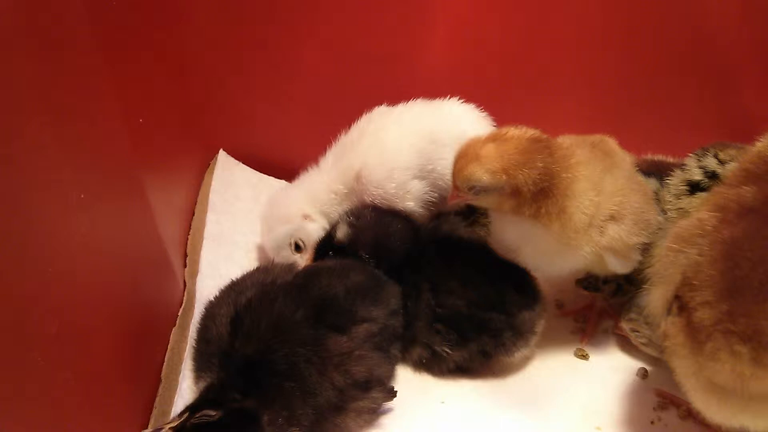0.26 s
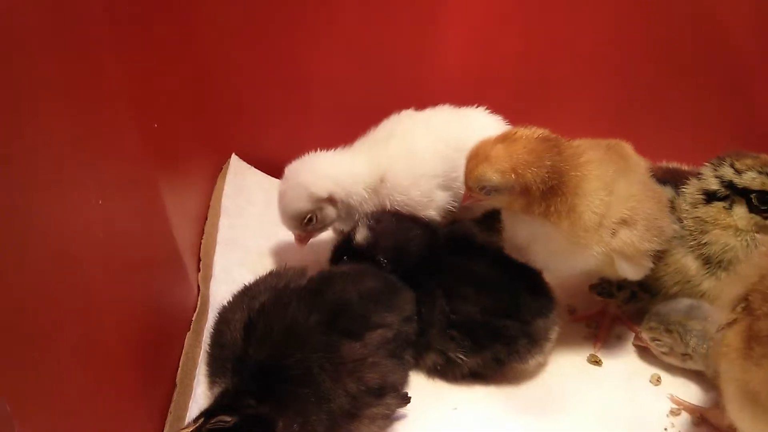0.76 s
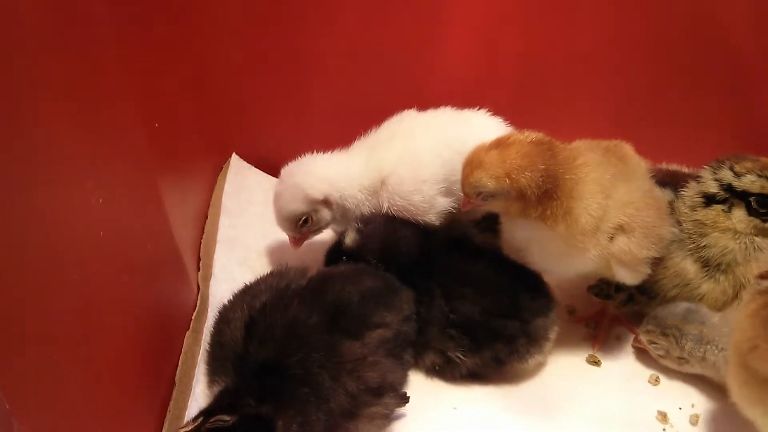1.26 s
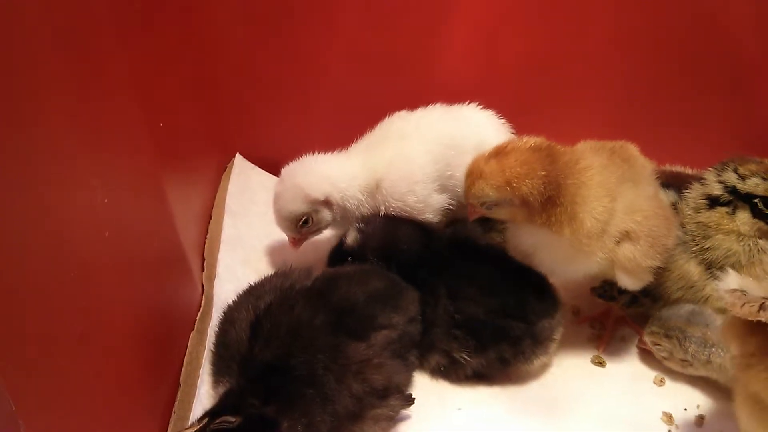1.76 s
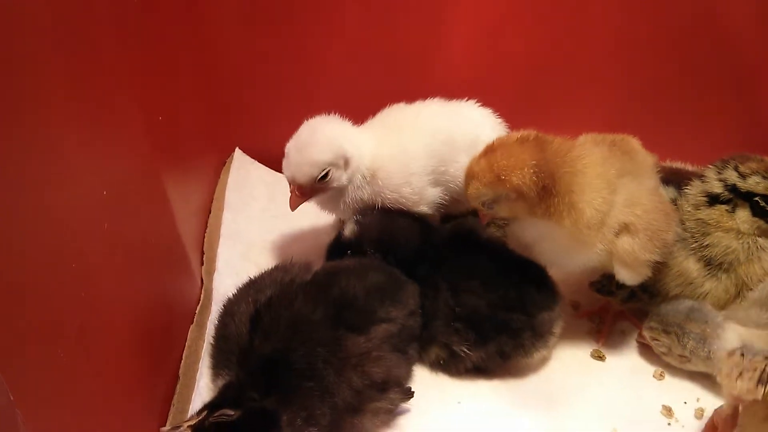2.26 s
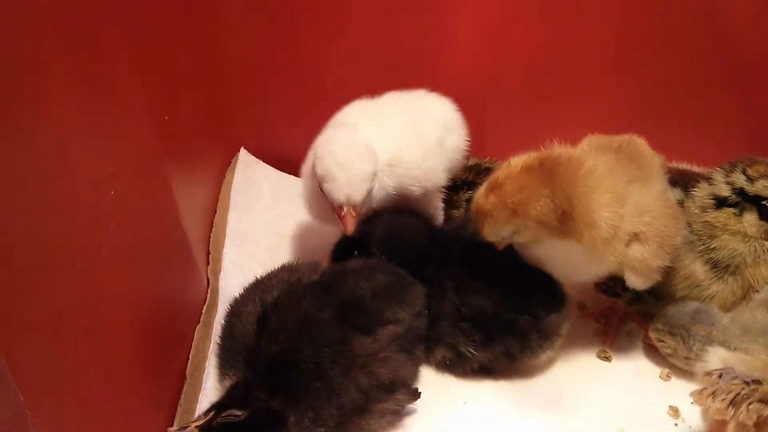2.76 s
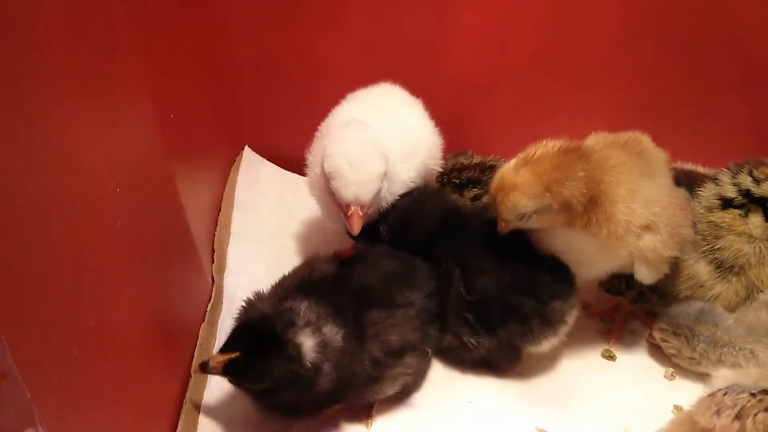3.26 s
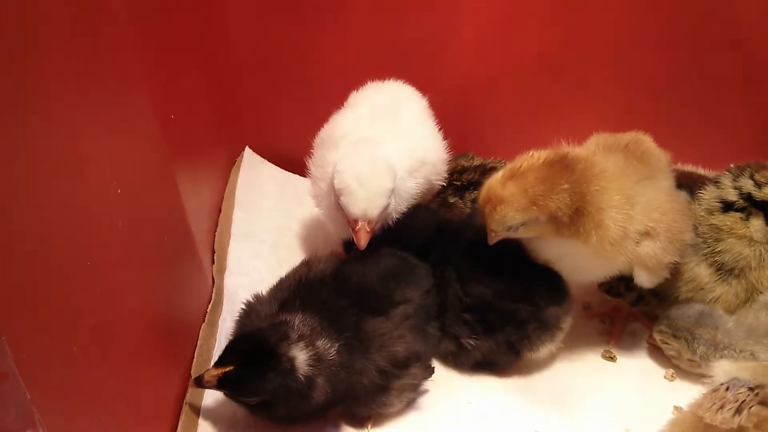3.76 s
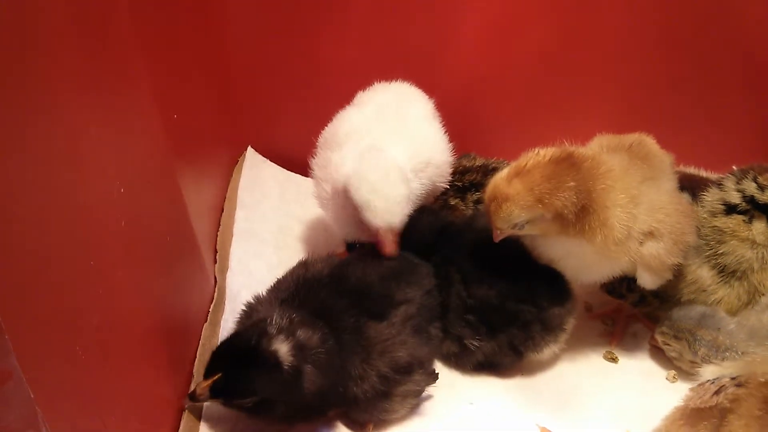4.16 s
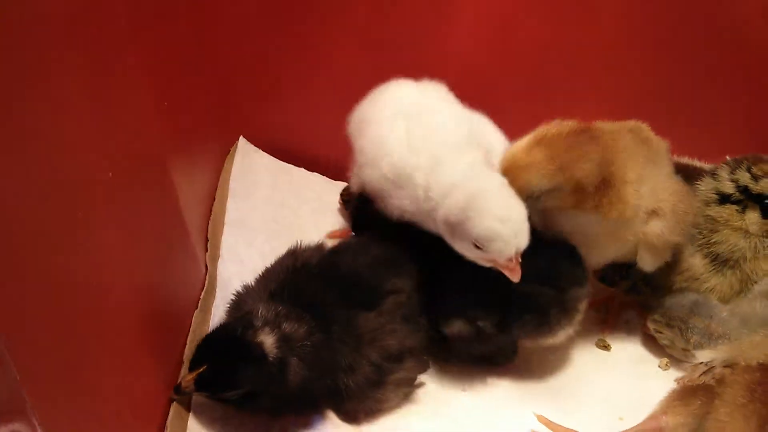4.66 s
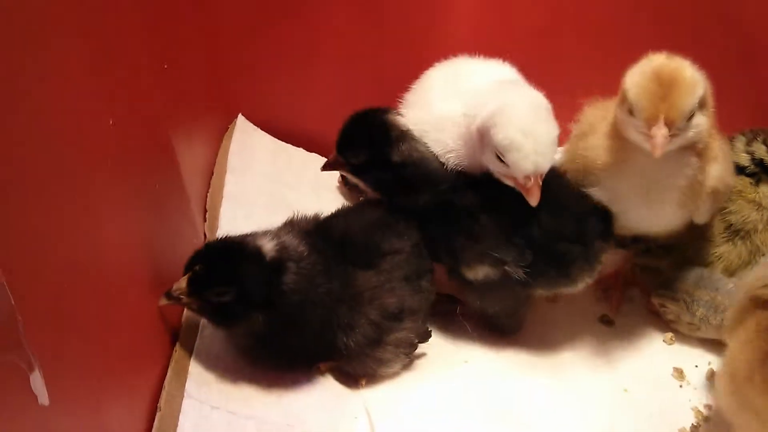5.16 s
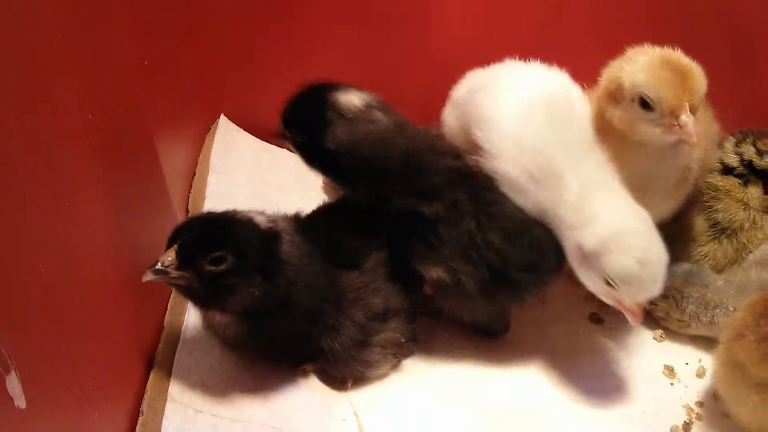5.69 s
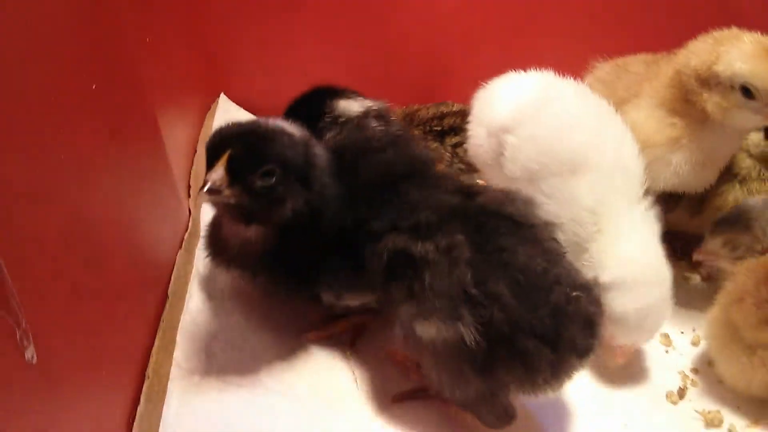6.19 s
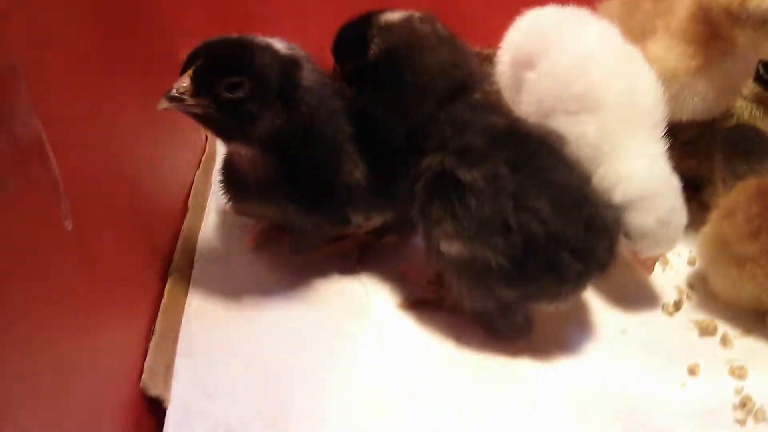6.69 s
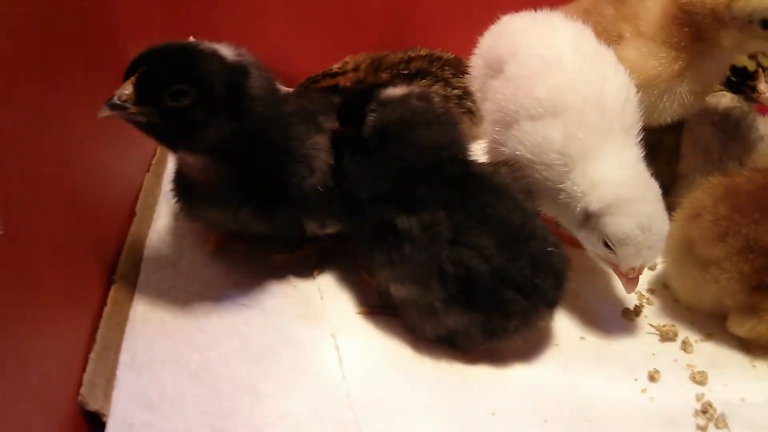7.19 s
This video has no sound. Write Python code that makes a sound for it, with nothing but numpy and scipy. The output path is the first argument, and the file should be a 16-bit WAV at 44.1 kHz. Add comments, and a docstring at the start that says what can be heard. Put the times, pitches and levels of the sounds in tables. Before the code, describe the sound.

Indoors, close to a plastic brooder tub, chicks peep in very short, upward-whipping whistles. A couple of peeps and low thumps come first, then a quiet gap with faint scuffs. Scattered peeps return, one loud, then a brief trill and a busy run of calls with knocks, hollow taps and claws scraping paper. Two hard beak snaps hit right at the microphone. Soft room hiss and low hum lie beneath.

```python
"""Over room hiss and a wavering low hum, restless feet patter; chicks peep in a plastic tub.
The first peeps are frequency-modulated whistles with weak overtones, combed by delayed bounces in the tub.
Paper scuffs follow as swelling noise bursts, then knocks as short pushes convolved with panel resonances,
then light taps as damped single modes; treble hiss swells after each call, knock and scuff. Later come
wavering trills and, close to the microphone, two beak strikes: pressure pulses with a damped cavity ring."""
import sys
import numpy as np
from scipy import signal
from scipy.fft import rfft, irfft
from scipy.io import wavfile
from scipy.ndimage import uniform_filter1d

SR = 44100
rng = np.random.default_rng(int(sys.argv[2]) if len(sys.argv) > 2 else 0)


def to_wav(sig):
    """Store sig (one row per channel, or 1-D mono) as 16-bit WAV at the path in sys.argv[1].

    Samples outside -1..1 are clipped; the rate is SR.
    """
    pcm = np.clip(np.atleast_2d(sig), -1, 1) * 32767
    pcm = np.round(pcm).astype(np.int16)
    wavfile.write(sys.argv[1], SR, pcm.T)  # frames by channels


N = 328104


def undb(db):
    """Level definition: amplitude ratio from decibels."""
    return 10 ** (np.asarray(db) / 20)


def unit(x):
    """Normalisation: scales a signal to rms 1."""
    return x / np.sqrt(np.mean(x ** 2))


def curve(s, values):
    """Linear interpolation between points, at every sample."""
    return np.interp(np.arange(N) / SR, s, values)


def coloured(x, shape):
    """Spectral shaping: weights the spectrum by (f/Hz, level/dB) points and scales to rms 1."""
    points_hz, points_db = np.transpose(shape)
    f = np.arange(N // 2 + 1) * SR / N + 1
    gain = undb(np.interp(np.log(f), np.log(points_hz), points_db))
    return unit(irfft(rfft(x) * gain, N))


def band(x, hz, width_hz):
    """Resonance: a two-pole band-pass, scaled to rms 1."""
    b, a = signal.iirpeak(hz, hz / width_hz, SR)
    return unit(signal.lfilter(b, a, x))


def walk(rate):
    """Random modulation, slow or fast by its rate: levels drawn every 1 / rate s, smoothed, rms 1."""
    hold = int(SR / rate)
    steps = np.repeat(rng.standard_normal(N // hold + 1), hold)
    return unit(uniform_filter1d(steps, hold)[:N])


def add(track, s, sound):
    """Superposition: mixes a sound in at s seconds."""
    i = int(s * SR)
    track[i:i + len(sound)] += sound[:N - i]


# Spectrum of the room hiss: f/Hz, relative density level/dB
ROOM_SPECTRUM = [(15, -44), (25, -12), (48, -2.5), (116, -5.5), (241, -9.5), (981, -18), (1730, -20.5),
                 (2700, -32), (3700, -36.5), (5370, -32), (8490, -22.5), (15800, -29)]
# Course of the hum: t/s, level/dB
HUM_LEVELS = [(1.3, -66), (1.8, -65), (3.4, -62), (3.8, -64)]
ROOM_DB = -67.5
HISS_SWELL_DB, HISS_SWELL_PER_S = 1.6, 11
HUM_HZ, HUM_WIDTH_HZ = 94, 6


def room():
    """Filtered noise: hiss under random amplitude modulation, and a narrow band heard as a wavering hum."""
    hum = band(rng.standard_normal(N), HUM_HZ, HUM_WIDTH_HZ) * undb(curve(*np.transpose(HUM_LEVELS)))
    hiss_level = undb(ROOM_DB + HISS_SWELL_DB * walk(HISS_SWELL_PER_S))
    return hiss_level * coloured(rng.standard_normal(N), ROOM_SPECTRUM) + hum


# Treble hiss level/dB after a sound at REFERENCE_DB; share of each further dB
HISS_PEEP_DB, HISS_KNOCK_DB, HISS_SCUFF_DB, HISS_SHARE = -67.5, -74.5, -61, 0.4
REFERENCE_DB = -40


def hiss_swells():
    """Level scaling: (t/s, level/dB) of the treble hiss after each call, knock and scuff."""
    kinds = [(PEEP_CALLS + TRILL_CALLS, 6, HISS_PEEP_DB),
             (KNOCK_BLOWS, 1, HISS_KNOCK_DB),
             (SCUFF_STROKES, 2, HISS_SCUFF_DB)]  # rows, their level column, hiss level
    return [(row[0], db + HISS_SHARE * (row[column] - REFERENCE_DB))
            for rows, column, db in kinds for row in rows]


# Resonances of the tub panels: f/Hz, relative level/dB, reverberation time t60/s
TUB_PANELS = [(58.15, 3, 0.48), (87.9, -7.5, 0.12), (133, 9, 0.061), (203.3, 7.5, 0.13), (293, 7.5, 0.048),
              (491, 6, 0.065), (749, 3.5, 0.056), (847, -1, 0.046), (1410, -6, 0.047)]
# Course of the patter of restless feet: t/s, level/dB before the low-pass
PATTER_LEVELS = [(0.0, -67.5), (0.89, -73.5), (2.98, -66.5), (4.48, -67), (5.1, -60.5), (5.78, -60),
                 (5.97, -52.5), (6.42, -61.5), (7.44, -71.5)]
SETTLE_S = 0.089  # time constant with which the power of the treble hiss dies away


def stir():
    """Random steps excite panel modes; treble hiss swells after each call, knock and scuff and dies away."""
    steps = rng.standard_normal(N) * undb(4.5 * walk(80))
    patter = sum(undb(db) * band(band(steps, hz, hz / 2), hz, 5.2 / t60) for hz, db, t60 in TUB_PANELS)
    power, t = np.zeros(N), np.arange(SR) / SR
    for s, db in hiss_swells():
        add(power, s, undb(2 * db) * np.minimum(t / .02, 1) * np.exp(-t / SETTLE_S))
    hiss = band(band(rng.standard_normal(N), 7000, 6000), 20000, 8400)
    hiss = hiss * undb(1.5 * walk(30) + 1.5 * walk(300))
    # the swells add as powers, so the root gives the amplitude
    return undb(curve(*np.transpose(PATTER_LEVELS))) * unit(patter) + np.sqrt(power) * hiss


SCOOP_HZ, SCOOP_S = 150, 0.0028
CREEP_SHARE, HELD_SHARE = .22, -.05  # part of the climb made at a steady rate
HELD_LATE = 4  # lateness from which a note is held before its flick
SAG_HZ, SAG_S, SAG_POWER = 875, .014, 2.5


def glide(start_hz, top_hz, rise, fall, late):
    """Frequency modulation: scoops in, creeps up, sweeps to the top and sags as the breath runs out."""
    t = np.arange(int((rise + fall) * SR)) / SR
    x = np.minimum(t / rise, 1)
    # held notes droop until the flick
    creep = CREEP_SHARE * min(late, 1) ** 2 if late < HELD_LATE else HELD_SHARE
    climb = creep * x + (1 - creep) * np.sin(np.pi / 2 * x ** late) ** 2
    scoop = SCOOP_HZ * np.exp(-t / SCOOP_S)
    sag = SAG_HZ * (np.maximum(t - rise, 0) / SAG_S) ** SAG_POWER
    return start_hz + (top_hz - start_hz) * climb - scoop - sag


ATTACK_S, RELEASE_S = 0.0071, 0.0029
SWELL_DB_PER_S, FADE_POWER = 394.5, 0.42
TRILL_DB_PER_KHZ = 16  # trills are louder where they are higher
EFFORT_SHARE = 0.31  # overtone dB for each dB of the swell and fade
DEEP_HZ = 2990  # voices whose pitch begins below this crack
BREAK_HZ, BREAK_WIDTH_HZ = 3800, 350
CRACK_RAD, CRACK_DEPTH = .42, .14
THIN_DB, SHIMMER_DB = 9, 3.3
# Gliding calls before the tub's bounces: t/s, start f/Hz, top f/Hz, rise t/s, fall t/s, lateness of the
# rise [exponent], nominal peak level/dB, loudest after t/s, fade by the end level/dB,
# octave level/dB, third harmonic level/dB (both relative to the fundamental)
PEEP_CALLS = [(0.167, 2514, 4800, 0.051, 0.004, 1.7, -35, 0.031, 13, -17.5, -42),
              (0.471, 2905, 5250, 0.056, 0.016, 2.2, -41, 0.02, 2, -16.5, -38),
              (2.671, 3650, 4680, 0.046, 0.013, 4.1, -49.5, 0.046, 5, -11, -26),
              (2.723, 4450, 4890, 0.032, 0.018, 1.3, -46, 0.033, 16, -22, -38),
              (3.2, 3158, 4175, 0.031, 0.016, 1.6, -42, 0.036, 15, -40, -45),
              (3.364, 3640, 4390, 0.027, 0.018, 1.16, -42, 0.027, 12, -20, -40),
              (3.387, 2796, 4450, 0.046, 0.006, 2.05, -39, 0.024, 7, -22, -42),
              (3.926, 3350, 4350, 0.038, 0.014, 1.34, -43, 0.032, 7, -23, -49),
              (4.01, 3060, 4250, 0.038, .003, 1, -50, 0.018, 3, -22, -44),
              (4.047, 2846, 4100, 0.048, 0.0041, 7.6, -52, 0.023, 6.5, -6, -30),
              (4.351, 2928, 3880, 0.062, 0.005, 10, -57.5, 0.023, 0.5, -7, -9),
              (4.439, 2950, 4830, 0.053, 0.013, 2.1, -25, 0.023, 20, -17, -29),
              (4.673, 3690, 4400, 0.03, 0.01, 2.4, -36, 0.048, -6, -16, -38),
              (5.209, 3250, 4780, 0.033, 0.014, 1.23, -48, 0.028, 7, -10, -30),
              (5.237, 3870, 4405, 0.041, 0.0048, 1.07, -33.5, 0.031, 14, -17, -40),
              (5.297, 2860, 5170, 0.056, 0.0044, 1.95, -26.5, 0.02, 16.5, -13, -28),
              (5.437, 3660, 4820, 0.018, 0.017, 0.8, -44, 0.022, 17, -13, -35),
              (5.513, 3450, 4415, 0.035, 0.017, 1.57, -36, 0.036, 5, -12.5, -30),
              (5.541, 3018, 5280, 0.047, 0.013, 3.1, -30.5, 0.024, 15.5, -17, -31),
              (5.715, 3700, 4248, 0.05, 0.012, 0.29, -33.5, 0.031, 20.5, -8.5, -50),
              (5.851, 3880, 4510, 0.036, 0.012, 0.208, -31, 0.04, 10, -18.5, -24),
              (5.952, 2897, 5240, 0.062, 0.003, 2.4, -38, 0.021, 1, -9.5, -18),
              (5.977, 2914, 4370, 0.05, 0.0047, 2.0, -32, 0.024, 16.5, -24, -40),
              (6.056, 3490, 4467, 0.04, 0.017, 0.75, -34.5, 0.035, 15, -12.5, -18),
              (6.236, 3385, 4346, 0.034, 0.017, 1.33, -34, 0.019, 10, -17.5, -24.5),
              (6.617, 3000, 5180, 0.056, 0.0071, 2.6, -32.5, 0.021, 8, -3.5, -15.5),
              (6.761, 3370, 4360, 0.038, 0.015, 2.5, -38, 0.033, 7.5, -21, -34),
              (7.191, 2750, 2790, 0.034, 0.0016, 1.9, -50.5, .008, 11, -22, -40),
              (7.226, 2856, 4660, 0.052, 0.016, 2.47, -30, 0.024, 16, -24, -33),
              (7.294, 3074, 4800, 0.051, 0.0057, 2.5, -28.5, 0.02, 12, -13, -29)]


def peeps():
    """Harmonic synthesis of syrinx whistles, glides and trills; period doubling cracks the deep voices."""
    out = np.zeros(N)
    flutter, wobble, shimmer = walk(1500), walk(150), walk(200)
    calls = [(row[0], glide(*row[1:6]), 0, *row[6:]) for row in PEEP_CALLS]
    calls += [(row[0], trill(*row[1:6], row[-1]), TRILL_DB_PER_KHZ, *row[6:-1]) for row in TRILL_CALLS]
    for s, pitch, lift_db, db, loudest, fade_db, octave_db, third_db in calls:
        u, length = np.linspace(0, 1, len(pitch)), len(pitch) / SR
        during = slice(int(s * SR), int(s * SR) + len(u))
        hz = pitch * (1 + 0.0077 * wobble[during])

        lift = lift_db * (pitch - pitch.mean()) / 1e3
        swell = SWELL_DB_PER_S * np.maximum(loudest - u * length, 0)
        fade = fade_db * np.interp(u * length, [loudest, length], [0, 1]) ** FADE_POWER
        level_db = db + lift - swell - fade

        deep = pitch[0] < DEEP_HZ
        above_break = (hz - BREAK_HZ) / BREAK_WIDTH_HZ
        thin = deep * np.clip(above_break + 0.27, 0, 1)  # weaker and rougher above the crack
        cracked = deep * np.exp(-above_break ** 2)
        edges = np.minimum(1, length * np.minimum(u / ATTACK_S, (1 - u) / RELEASE_S))
        size = undb(level_db - THIN_DB * thin + SHIMMER_DB * shimmer[during]) * edges

        roughness_rad = 0.007 + CRACK_RAD * np.maximum(cracked, thin / 2)
        phase = 2 * np.pi * np.cumsum(hz) / SR + roughness_rad * flutter[during]
        effort_db = EFFORT_SHARE * (level_db - db) - THIN_DB * thin  # overtones grow with effort
        overtones = undb(octave_db) * np.sin(2 * phase) + undb(third_db) * np.sin(3 * phase)
        # strong and weak cycles alternate in the crack: lines at half and one and a half times the pitch
        fundamental = np.sin(phase) * (1 + CRACK_DEPTH * cracked * np.sin(phase / 2))
        add(out, s, size * (fundamental + undb(effort_db) * overtones))
    return out


# Bounces off floor and wall of the tub: delay t/s, level/dB relative to the direct sound
TUB_BOUNCES = [(.00302, -3), (.00603, -10)]
TAIL_DB, TAIL_T60_S = -8.5, 0.11  # tub; relative level
LATE_DB, LATE_T60_S = -37, .35  # room; relative level
TAIL_HZ, TAIL_WIDTH_HZ = 4300, 2600


def in_tub(x):
    """Comb filtering by close bounces, then reverberation: a short bright tub tail and a faint room tail."""
    t = np.arange(SR // 2) / SR
    tails = undb(TAIL_DB) * 1000. ** (-t / TAIL_T60_S) + undb(LATE_DB) * 1000. ** (-t / LATE_T60_S)
    scatter = band(rng.standard_normal(len(t)), TAIL_HZ, TAIL_WIDTH_HZ)
    echo = scatter * tails * np.clip(t / 0.004, 0, 1) / np.sqrt(SR / 20)
    echo[0] = 1  # direct sound
    for s, db in TUB_BOUNCES:
        echo[int(s * SR)] += undb(db)
    return signal.fftconvolve(x, echo)[:N]


# Spectrum of rustling paper, also used for the cracks of the knocks: f/Hz, relative density level/dB
RUSTLE_SPECTRUM = [(880, -9), (1500, -9), (2960, -20.5), (4260, -11), (4840, -5.5), (6450, -8), (8750, -2),
                   (15800, -17.5)]
# Strokes of the claws: crest t/s, time scale t/s, nominal rustle level/dB, nominal scrape level/dB
SCUFF_STROKES = [(0.264, 0.025, -61.5, -74), (0.447, 0.0067, -54.5, -84), (2.062, 0.039, -62, -71),
                 (2.099, 0.0034, -53.5, -60), (2.793, 0.031, -60.5, -73), (2.925, 0.012, -41, -41.5),
                 (2.999, 0.19, -67, -65), (3.058, 0.03, -61.5, -61), (3.407, 0.0066, -56, -62),
                 (3.426, 0.0054, -55, -63), (3.723, 0.035, -70, -61), (4.468, 0.012, -55.5, -72.5),
                 (4.716, 0.0016, -57.5, -76), (4.966, 0.03, -56.5, -59), (5.679, 0.0078, -59, -74.5),
                 (5.896, 0.0098, -49, -40), (5.98, 0.15, -63, -61), (6.287, 0.0033, -51, -43),
                 (6.525, 0.025, -61.5, -70.5), (7.067, 0.023, -64, -79)]


def scuffs():
    """Friction noise of claws over paper: gritty bursts of bright rustle and duller scrape."""
    t = np.arange(N) / SR
    grit = undb(3 * walk(500))
    rustle = grit * coloured(rng.standard_normal(N), RUSTLE_SPECTRUM)
    scrape = band(band(grit * rng.standard_normal(N), 790, 860), 1000, 1200)
    out = np.zeros(N)
    for s, spread, rustle_db, scrape_db in SCUFF_STROKES:
        near = slice(int((s - 4 * spread) * SR), int((s + 4 * spread) * SR))
        steepness = np.where(t[near] < s, 4, 1.5)  # bites fast, trails off
        swell = 1 / np.cosh((t[near] - s) / spread * steepness)
        out[near] += swell * (undb(rustle_db) * rustle[near] + undb(scrape_db) * scrape[near])
    return out


# Blows on the tub: t/s, nominal push level/dB, push f/Hz, nominal crack level/dB
KNOCK_BLOWS = [(0.307, -22, 157, -53.5), (0.56, -20.5, 176, -44.5), (1.186, -27.5, 158, -55),
               (1.814, -36.5, 113, -97), (2.879, -38, 493, -70.5), (2.886, -30.5, 500, -58),
               (3.097, -32, 156.6, -58), (3.581, -42.5, 230, -95), (3.653, -33.5, 197, -53.5),
               (3.716, -37, 207, -87), (4.082, -35, 167, -60), (4.847, -46, 254, -59),
               (4.957, -34, 294, -55), (5.023, -27, 160.5, -51.5), (5.032, -33, 119, -71),
               (5.516, -35.5, 174, -56.5), (5.801, -38, 186, -58), (5.893, -21.5, 219, -40),
               (5.933, -21, 183, -49), (6.068, -17.5, 186, -45), (6.286, -29.5, 130, -61),
               (6.62, -35.5, 510, -84), (6.636, -28, 504, -74), (6.723, -20.5, 530, -46),
               (7.062, -34.5, 130.3, -82.5)]


def knocks():
    """Impact response: a push, longer for low thumps, heard directly, through panel modes and a rattle."""
    push, crack = np.zeros(N), np.zeros(N)
    chance = rng.standard_normal((len(KNOCK_BLOWS), 600))
    for (s, db, hz, crack_db), noise in zip(KNOCK_BLOWS, chance):
        turns = np.arange(int(5 * SR / hz)) * hz / SR
        # the panel stiffens under the blow, which adds an overtone to the push
        wave = np.sin(2 * np.pi * turns) + 0.17 * np.sin(2 * np.pi * 1.99 * turns)
        envelope = (turns / 0.92 * np.exp(1 - turns / 0.7)) ** 2
        add(push, s, -undb(db) * wave * envelope)
        add(crack, s + .3 / hz, undb(crack_db) * noise * np.exp(-np.arange(600) / SR / .003))
    t = np.arange(SR // 2) / SR
    ring = sum(undb(db) * hz / SR * np.sin(2 * np.pi * hz * t) * 1000. ** (-t / t60)
               for hz, db, t60 in TUB_PANELS)
    rattle = rng.standard_normal(len(t)) * 1000. ** (-t / 0.24)
    body = signal.fftconvolve(push, undb(-13.5) * ring + undb(-32.0) * rattle)[:N]
    bright_crack = crack.std() * coloured(crack, RUSTLE_SPECTRUM)
    dull_crack = undb(17.5) * signal.lfilter(*signal.butter(2, 900, fs=SR), crack)
    thump = signal.lfilter(*signal.butter(2, 55, "high", fs=SR), push + body)
    return thump + (bright_crack + dull_crack)


# Light pecks and claw taps that ring the hollow of the tub: t/s, nominal level/dB
TAP_STRIKES = [(1.554, -52.5), (2.879, -39.5), (2.887, -39), (3.047, -45), (3.117, -56), (4.849, -42.5),
               (4.909, -50), (4.959, -39), (4.974, -41.5), (5.024, -38), (5.049, -50.5), (5.678, -50.5),
               (5.861, -50), (5.894, -33), (6.002, -43), (6.012, -43), (6.07, -39.5), (6.618, -47),
               (6.638, -43.5), (6.722, -33), (6.975, -50)]
TAP_HZ, TAP_SPREAD = 925, 0.024  # mean, and standard deviation as a share of it
TAP_T60_S, TAP_RISE_S = 0.041, 0.00068


def taps():
    """Damped single mode: each tap rings one hollow note, its pitch drawn at random around a mean."""
    out, t = np.zeros(N), np.arange(SR // 8) / SR
    envelope = (1 - np.exp(-t / TAP_RISE_S)) * 1000. ** (-t / TAP_T60_S)
    for (s, db), draw in zip(TAP_STRIKES, rng.standard_normal(len(TAP_STRIKES))):
        hz = TAP_HZ * (1 + TAP_SPREAD * draw)
        add(out, s, undb(db) * np.sin(2 * np.pi * hz * t) * envelope)
    return out


# Wavering calls, voiced with the peeps: t/s, length t/s, middle f/Hz, initial swing f/Hz, first dip after t/s,
# period t/s, nominal peak level/dB, loudest after t/s, fade by the end level/dB,
# octave level/dB, third harmonic level/dB (both relative to the fundamental), drop at the start f/Hz
TRILL_CALLS = [(4.829, 0.032, 4053, 289, 0.016, 0.021, -39.5, 0.039, -1, -15.5, -33.5, 50),
               (4.925, 0.056, 4407, 646, 0.011, 0.034, -26.5, 0.032, 0.5, -26.5, -34.5, 295.5)]
TRILL_DROP_S, SWING_DECAY_S = .003, 0.094


def trill(length, middle_hz, swing_hz, dip, period, drop_hz):
    """Damped frequency modulation: pitch drops in from above, then swings down and up, less each time."""
    t = np.arange(int(length * SR)) / SR
    drop = drop_hz * np.exp(-t / TRILL_DROP_S)
    swing = swing_hz * np.exp(-t / SWING_DECAY_S) * np.cos(2 * np.pi * (t - dip) / period)
    return middle_hz + drop - swing


# Beak strikes close to the microphone: t/s, dip level/dB, nominal swing level/dB, swing f/Hz,
# nominal ring level/dB
BEAK_SNAPS = [(5.41, -34, -12.5, 303, 3.5), (7.1785, -23.5, -15.5, 199, -8)]


def snaps():
    """Pressure transient: a brief dip, then a step that swings back; the microphone cavity rings on top."""
    out, t = np.zeros(N), np.arange(900) / SR
    dip = -np.sin(np.pi * np.minimum(t / 0.00054, 1))
    rise = (1 - np.exp(-(t / 0.00084) ** 2)) * np.exp(-t / 0.0017)
    ring = np.sin(2 * np.pi * 5900 * t) * np.exp(-t / 0.00031) * t / 0.0015
    tick = uniform_filter1d(rng.standard_normal(len(t)), size=2) * np.exp(-t / 0.000072)
    for s, dip_db, swing_db, hz, ring_db in BEAK_SNAPS:
        swing = rise * np.cos(2 * np.pi * hz * (t - .0007))
        cavity = undb(ring_db) * (ring + undb(-22.0) * tick)
        add(out, s, undb(dip_db) * dip + undb(swing_db) * swing + cavity)
    return out


def scene():
    """Superposition of all sources; only the calls pass through the tub's bounces."""
    return (in_tub(peeps()) + knocks() + taps() + snaps() + scuffs() + stir() + room())[None]


TOP_HZ = 15800


def record(dry):
    """Band limiting: a steep elliptic low-pass cuts the top."""
    return signal.sosfilt(signal.ellip(10, .2, 70, TOP_HZ, fs=SR, output="sos"), dry)


dry = scene()
out = record(dry)
to_wav(out)
```